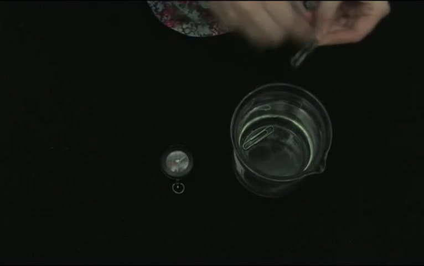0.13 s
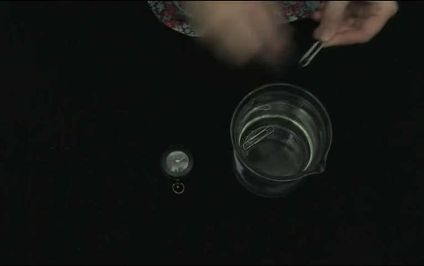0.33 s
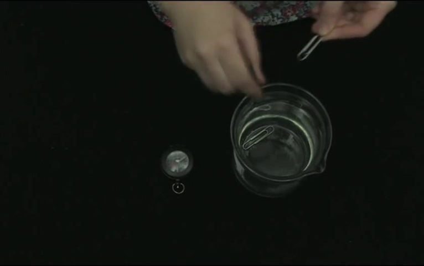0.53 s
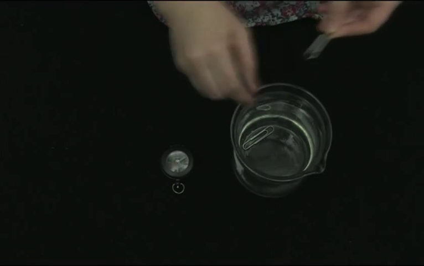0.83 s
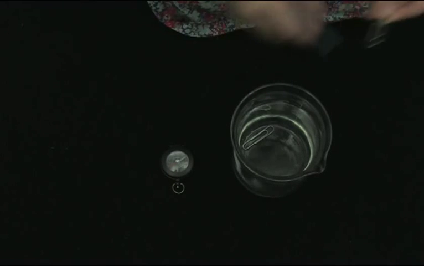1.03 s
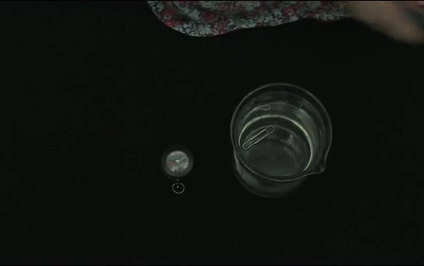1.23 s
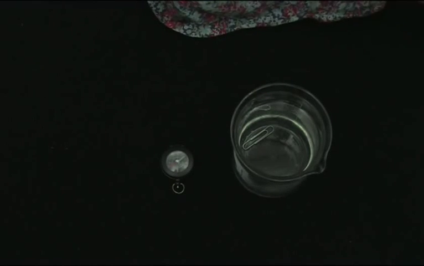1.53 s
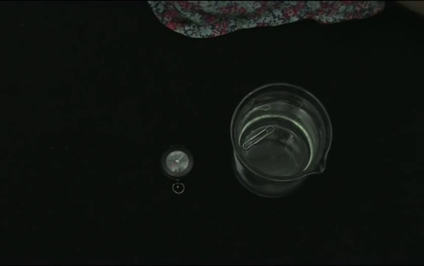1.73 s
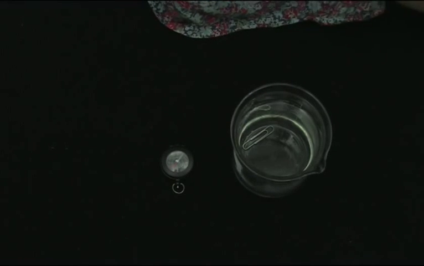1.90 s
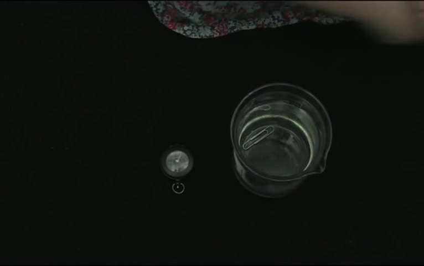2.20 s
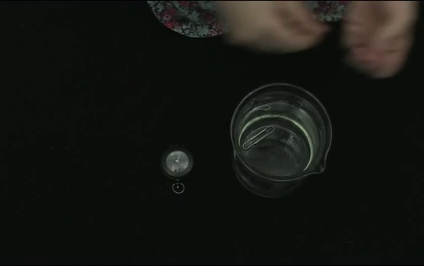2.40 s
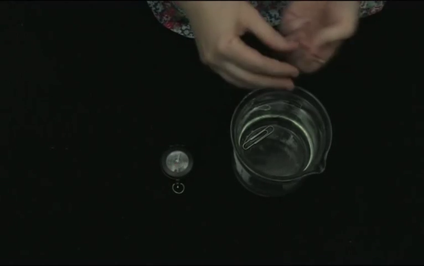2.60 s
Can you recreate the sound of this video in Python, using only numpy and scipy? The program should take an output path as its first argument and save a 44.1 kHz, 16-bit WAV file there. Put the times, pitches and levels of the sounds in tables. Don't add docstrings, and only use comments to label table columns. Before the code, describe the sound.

Paperclip clicks against a magnet with bright metallic snaps, followed by soft sleeve rubbing and table knocks

```python
import sys
import numpy as np
from scipy import signal
from scipy.io import wavfile

SR = 44100
rng = np.random.default_rng(int(sys.argv[2]) if len(sys.argv) > 2 else 0)


def gain_from_decibels(decibels):
    exponent = np.asarray(decibels, float) / 20
    return 10 ** exponent


def unload_audio(sound):
    columns = np.transpose(np.atleast_2d(sound))
    steps = np.round(np.clip(columns, -1, 1) * 32767)
    wavfile.write(sys.argv[1], SR, steps.astype(np.int16))


N = 121275


def rms_one(x):
    return x / np.sqrt(np.mean(x ** 2) + 1e-20)


def drift(rate):
    pole = np.exp(-80 * np.pi * rate / SR)
    steps = rng.standard_normal(N // 40 + 2002)
    slow = signal.lfilter([1], [1, -2 * pole, pole * pole], steps)[2000:]
    return np.interp(np.arange(N) / 40, np.arange(len(slow)), rms_one(slow))


def ring(x, hz, t60):
    pole, turn = gain_from_decibels(-60 / (t60 * SR)), 2 * np.pi * hz / SR
    return signal.lfilter([0, np.sin(turn)], [1, -2 * pole * np.cos(turn), pole * pole], x + 1e-18)


def struck(length, hz, t60, contact_s):
    click = np.zeros(length)
    click[0] = 1
    return ring(click, hz, t60) * (1 - np.exp(-np.arange(length) / SR / contact_s))


def add(out, s, piece):
    i = int(s * SR)
    part = piece[max(-i, 0):N - i]
    out[max(i, 0):max(i, 0) + len(part)] += part


def coloured(drive, spectrum, patchy_db, together_rate):
    out, together = 0, drift(together_rate)
    edges = 22 * 2 ** np.arange(0, 9.6, .5)
    hz, db = np.transpose(spectrum)
    for k, (low, high) in enumerate(zip(edges, edges[1:])):
        middle = np.log(low * high) / 2
        level_db = np.interp(middle, np.log(hz), db, left=db[0] - 5, right=db[-1] - 20)
        bandpass = signal.butter(2, [low, high], "band", fs=SR, output="sos")
        band = signal.sosfilt(bandpass, drive[k % 2])
        flicker_db = patchy_db * (0.62 * together + 0.28 * drift(14.4))
        out = out + gain_from_decibels(level_db + flicker_db) * band
    return rms_one(out)


# f/Hz, level/dB
ROOM_COLOUR = [(22, -21), (60, 0), (150, 1.5), (300, -6.5), (700, -16.5), (1500, -24.5), (4000, -31.5),
               (10500, -42)]


def room():
    tone = coloured(rng.standard_normal((2, N)), ROOM_COLOUR, patchy_db=4.0, together_rate=18.3)
    return gain_from_decibels(-53.5) * tone + gain_from_decibels(-65.5) * rng.standard_normal(N)


# t/s, length/s, song level/dB, grit level/dB
SLIDES = [
    (-.04, 0.064, -56, -71),
    (0.225, 0.032, -50, -50),
    (0.499, 0.02, -60, -66),
    (0.516, 0.017, -56, -49),
    (0.774, 0.017, -54, -66),
    (0.788, 0.023, -41, -51),
    (1.055, 0.11, -69, -90),
]


def slides():
    song_hz, song_wide_hz = 7930, 70
    grit_hz, grit_wide_hz, grit_broad_db = 9550, 900, 2
    white = rng.standard_normal((3, N))
    song = rms_one(ring(white[0], song_hz, 2.8 / song_wide_hz))
    grit = rms_one(ring(white[1], grit_hz, 6.2 / grit_wide_hz)) + gain_from_decibels(grit_broad_db) * white[2]
    grit = grit * gain_from_decibels(1.4 * drift(160))
    t, out = np.arange(N) / SR, np.zeros(N)
    for s, length, song_db, grit_db in SLIDES:
        u = np.clip((t - s) / length, 0, 1)
        out += gain_from_decibels(song_db) * song * np.sin(np.pi * u) ** 0.73
        out += gain_from_decibels(grit_db) * grit * u ** 0.87 * (u < 1)
    return out


def echoes(x):
    level_db, t60_s = -20, .13
    t = np.arange(SR // 4) / SR
    tail = rng.standard_normal(len(t)) * gain_from_decibels(-60 * t / t60_s) * (t > .003)
    return gain_from_decibels(level_db) * signal.fftconvolve(x, tail / np.linalg.norm(tail))[:N]


# t/s, level/dB, f/Hz
KNOCKS = [(-.016, -40.5, 43.2), (0.084, -39.5, 88), (0.372, -34.5, 140), (0.6563, -34, 170),
          (1.521, -31, 89), (2.159, -33, 110), (1.126, -31.5, 84), (1.302, -31, 133), (1.408, -51, 151),
          (1.594, -32, 140), (1.717, -24, 257), (2.052, -23, 260), (2.312, -32, 149), (2.463, -31.5, 122),
          (2.534, -36, 253), (0.242, -36.5, 189), (1.26, -40, 60.7), (.90, -40, 85), (.44, -42, 120),
          (1.96, -32, 120), (2.29, -38, 380), (1.50, -36, 270), (2.138, -38, 300)]


def knocks():
    out = np.zeros(N)
    for s, db, hz in KNOCKS:
        cycles = np.arange(SR // 8) / SR * hz
        swell = 3 * cycles * np.exp(-6.9 * cycles / 4.37)
        add(out, s, -gain_from_decibels(db) * np.sin(2 * np.pi * cycles) * swell)
    return out


# t/s, level/dB, f/Hz, ring/cycles
TICKS = [(.0058, -37.5, 900, 6), (.0232, -38, 1350, 10.5), (.0590, -49, 2100, 7), (.3925, -34, 1940, 10.3),
         (.3930, -42, 3100, 25), (.2075, -27, 594, 2.3), (.4826, -32.5, 2050, 8.3), (.7632, -33, 2280, 19),
         (1.4507, -29.5, 3500, 3.3), (1.4697, -28, 2500, 2.4), (1.5216, -42, 2500, 2.6),
         (1.7176, -21.5, 1700, 6.6), (1.7635, -20, 6500, 2.5), (1.8299, -18.5, 6000, 3.9),
         (1.8543, -17, 4000, 2.6), (1.8728, -43, 5000, 2.8), (2.0285, -31, 3000, 3), (2.0410, -36, 4500, 3),
         (2.0505, -25.5, 1300, 5.5), (2.0515, -33, 9300, 14), (2.3170, -28, 1100, 3.2),
         (2.3855, -34.5, 2000, 4.1), (2.1040, -36, 2000, 5), (2.0815, -35, 1700, 5), (1.9095, -30, 3000, 3),
         (2.0100, -30, 1000, 4)]


def ticks():
    out = np.zeros(N)
    for s, db, hz, cycles in TICKS:
        add(out, s, gain_from_decibels(db) * struck(SR // 8, hz, cycles / hz, 0.24 / hz))
    return out


# f/Hz, level/dB, t60/s
BODY = [(1300, -22, .005), (2160, -18, .007), (2510, -16, .009), (3720, -10, .007), (4600, -13, .007),
        (5350, -8, .007), (6300, -16, .004), (7060, -6, .006), (8560, -4, .005), (9600, -6, .005)]


def crack(noise, hz):
    chatter_s, rattle_s, rattle_db, wide = 0.0005, 0.0031, -14, 0.43
    t = np.arange(len(noise)) / SR
    drive = noise * (np.exp(-t / chatter_s) + gain_from_decibels(rattle_db) * np.exp(-t / rattle_s))
    tone = ring(ring(drive, hz, 2.1 / (wide * hz)), hz, 1.46 / (wide * hz))
    broad = 0
    for k, (f, db, t60) in enumerate(BODY):
        broad = broad + gain_from_decibels(db) * ring(drive, f, t60) * (-1) ** k
    return tone / abs(tone).max() + gain_from_decibels(-4.5) * broad / abs(broad).max()


# f/Hz, level/dB, t60/s
MAIN_MODES = [(7900, 0, .021), (7990, -34, .1)]
# f/Hz, level/dB, t60/s
WIRE_MODES = [(7600, -26, 0.01), (6640, -27, .012), (9600, -7, 0.009), (10200, -18, 0.0041),
              (9030, -20, .008), (5350, -22, 0.012), (4600, -25, 0.014), (3740, -25, 0.013),
              (2520, -27, 0.023)]


def wire_ring():
    luck_db = rng.normal(0, 2, len(MAIN_MODES) + len(WIRE_MODES))
    luck_db[:len(MAIN_MODES)] = 0
    out = 0
    for (f, db, t60), luck in zip(MAIN_MODES + WIRE_MODES, luck_db):
        out = out + gain_from_decibels(db + luck) * struck(SR // 4, f, t60, contact_s=0.00024)
    return out


def thump():
    hz, fade_s, stiff_turns, stiff_s = 30.5, 0.022, 0.553, 0.0055
    t = np.arange(SR // 4) / SR
    turns = hz * t + stiff_turns * (1 - np.exp(-t / stiff_s))
    return np.sin(2 * np.pi * turns) * np.exp(-t / fade_s)


# t/s, crack level/dB, wire ring level/dB, crack colour f/Hz, thump level/dB
TOUCHES = [(.2050, -21, -47, 8100, -41.5), (0.2076, -34, -39, 8900, -43.5), (0.2107, -50, -40, 4000, -70),
           (.2300, -47, -40, 7500, -68), (.2468, -42, -37, 9600, -44), (.2545, -34, -52, 4830, -55),
           (0.2557, -39.5, -26.5, 9150, -36), (0.4801, -24.5, -43, 7600, -41.5),
           (0.4826, -30.5, -38, 7350, -43), (0.523, -44, -55, 2100, -40), (0.5326, -30, -30.5, 4820, -67),
           (.5330, -27, -17.5, 9900, -30.5), (0.7642, -34, -46, 8800, -38), (0.7628, -27.5, -44, 6200, -55),
           (0.7897, -36, -38, 2200, -45), (.8100, -33, -42, 5350, -59), (0.8107, -22, -20, 9600, -33)]


def touches():
    out, table_thump = np.zeros(N), thump()
    for s, crack_db, ring_db, hz, thump_db in TOUCHES:
        noise = rng.standard_normal(900)
        noise[0] = 5
        add(out, s, gain_from_decibels(crack_db) * crack(noise, hz))
        add(out, s, gain_from_decibels(ring_db) * wire_ring())
        add(out, s, gain_from_decibels(thump_db) * table_thump)
    return out


def friction_swells(table):
    out = np.zeros(N)
    for s, length, db, hz, wide_hz in table:
        noise = rng.standard_normal(SR // 2)
        u = np.clip(np.arange(len(noise)) / SR / length, 0, 1)
        tone = rms_one(ring(noise, hz, 1.6 / wide_hz))
        add(out, s, gain_from_decibels(db) * tone * np.sin(np.pi * u) ** 0.3)
    return out


# t/s, length/s, level/dB, centre f/Hz, width f/Hz
BRUSHES = [(.395, 0.16, -62, 1040, 1300), (1.149, 0.11, -65, 5400, 1500), (1.156, 0.11, -69, 9300, 1500),
           (2.308, 0.025, -45.5, 670, 1070), (2.302, 0.027, -56, 5600, 6000),
           (2.363, 0.049, -63, 1220, 2500), (2.21, 0.22, -52, 210, 600), (2.3, 0.069, -69, 9400, 6000),
           (2.10, 0.089, -57, 710, 1200), (2.17, 0.47, -65, 4600, 8700), (2.50, 0.065, -64, 7100, 6000)]


def brushes():
    return friction_swells(BRUSHES)


# t/s, length/s, level/dB, centre f/Hz, width f/Hz
SQUEAKS = [
    (.40, .085, -70, 4600, 120),
    (.40, .08, -72, 1750, 200),
    (.94, .08, -75, 4500, 300),
    (2.26, .04, -67, 5600, 120),
]


def squeaks():
    return friction_swells(SQUEAKS)


# f/Hz, level/dB
TOP_COLOUR = [(25, -23), (45, -12.5), (90, 1.5), (140, -1.5), (270, -4.5), (400, -11.5), (550, -20)]
# t/s, level/dB
WEIGHT = [
    (1.0, -57.5),
    (1.906, -38),
    (2.07, -41),
    (2.12, -48.5),
    (2.45, -53),
    (2.75, -64),
]


def leaning():
    s, db = np.transpose(WEIGHT)
    weight_db = np.interp(np.arange(N) / SR, s, db, left=-120)
    rumble = coloured(rng.standard_normal((2, N)), TOP_COLOUR, patchy_db=2.0, together_rate=24)
    return gain_from_decibels(1.5 + weight_db) * rumble


# f/Hz, level/dB
CLOTH_COLOUR = [(210, -30), (350, -11.5), (808, -2.5), (961, -9.5), (1500, -10.5), (2200, -17),
                (2800, -14.5), (4630, -24), (9940, -33), (11000, -42), (14300, -92)]
# t/s, length/s, level/dB
RUB = [(1.38, 0.11, -62.5), (1.464, 0.033, -48.5), (1.516, 0.059, -48), (1.567, 0.043, -53),
       (1.6, 0.05, -49.5), (1.632, 0.093, -44), (1.697, .065, -43), (1.749, 0.11, -44),
       (1.85, 0.098, -42.5), (1.94, 0.032, -52.5), (1.958, 0.073, -44.5), (2.028, 0.025, -60),
       (2.04, 0.072, -49), (2.09, 0.1, -60.5), (2.19, 0.13, -66), (1.492, .04, -53)]


def rubbing():
    grains_per_s, grain_spread_db, smooth_share = 1800, 3.6, .47
    attack, release = 0.22, 0.28
    t, strokes = np.arange(N) / SR, np.zeros(N)
    for s, length, db in RUB:
        strokes += gain_from_decibels(db) * np.interp((t - s) / length, [0, attack, 1 - release, 1], [0, 1, 1, 0])
    sizes = gain_from_decibels(grain_spread_db * np.minimum(rng.exponential(1, (2, N)), 5))
    sizes = sizes * rng.choice([-1, 1], (2, N))
    chance = grains_per_s * gain_from_decibels(5 * drift(25)) / SR
    grains = rms_one(sizes * (rng.random((2, N)) < chance))
    drive = smooth_share * rng.standard_normal((2, N)) + (1 - smooth_share) * grains
    cloth = coloured(drive, CLOTH_COLOUR, patchy_db=1.5, together_rate=49)
    hollow_hz, hollow_q, hollow_share = 1016, 1.85, 0.64
    cloth = cloth - hollow_share * signal.lfilter(*signal.iirpeak(hollow_hz, hollow_q, SR), cloth)
    weave_hz, weave_wide_hz, weave_db = 3000, 900, -12
    cloth = cloth + gain_from_decibels(weave_db) * rms_one(ring(cloth, weave_hz, 0.97 / weave_wide_hz))
    return gain_from_decibels(2.5) * strokes * cloth


# t/s, level/dB, f/Hz
SNAPS = [(1.5300, -46, 8000), (1.5744, -51, 5300), (1.6064, -52, 4880), (1.7564, -44, 7180),
         (1.7824, -44, 7000), (1.8755, -44, 9800), (1.8874, -41, 7850), (1.9130, -41, 4760),
         (1.9214, -41, 10000), (1.9284, -38, 8140), (1.9575, -45, 7500), (1.9734, -41, 9500),
         (1.9844, -43, 8940), (1.9984, -43, 8610), (2.0084, -45, 9170), (2.0124, -40, 9600),
         (2.0574, -45, 9500), (2.0634, -46, 7040), (2.0694, -46, 10100), (2.0814, -45, 9800),
         (2.1434, -52, 8060)]


def snaps():
    out = np.zeros(N)
    for s, db, hz in SNAPS:
        add(out, s, gain_from_decibels(db + 7) * struck(SR // 8, hz, 9.0 / hz, 0.24 / hz))
    return out


def scene():
    near = touches() + slides() + ticks() + snaps() + knocks()
    hands = rubbing() + leaning() + brushes() + squeaks()
    return (near + echoes(near) + hands + room())[None]


def band_limit(x):
    return signal.sosfilt(signal.butter(12, 11640, fs=SR, output="sos"), x)


def record(dry):
    lowpass = signal.firwin(301, 10420, window=("kaiser", 3.3), fs=SR)
    mix = signal.fftconvolve(dry, lowpass[None], "same")
    return band_limit(mix)


dry = scene()
out = record(dry)
unload_audio(out)
```